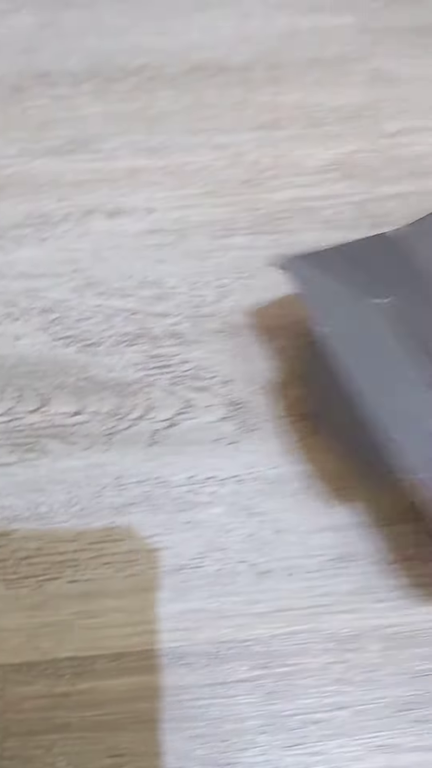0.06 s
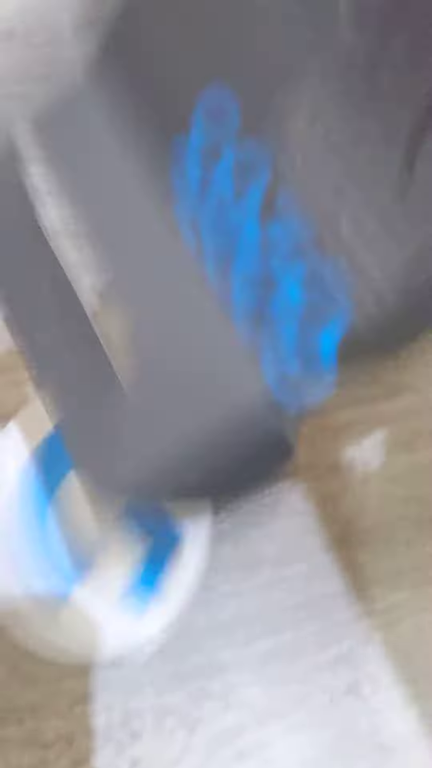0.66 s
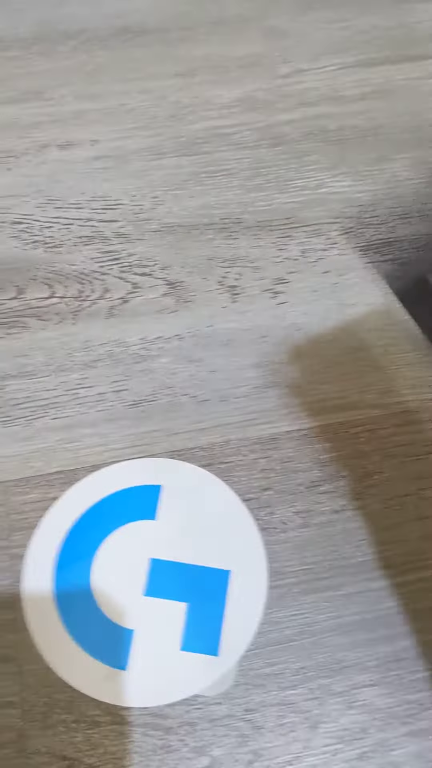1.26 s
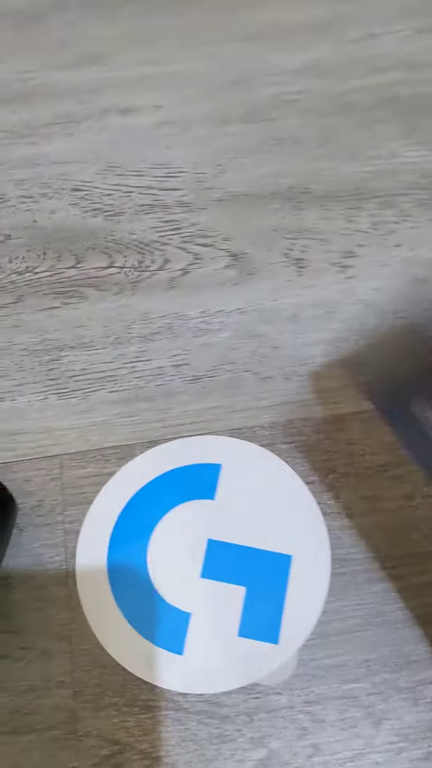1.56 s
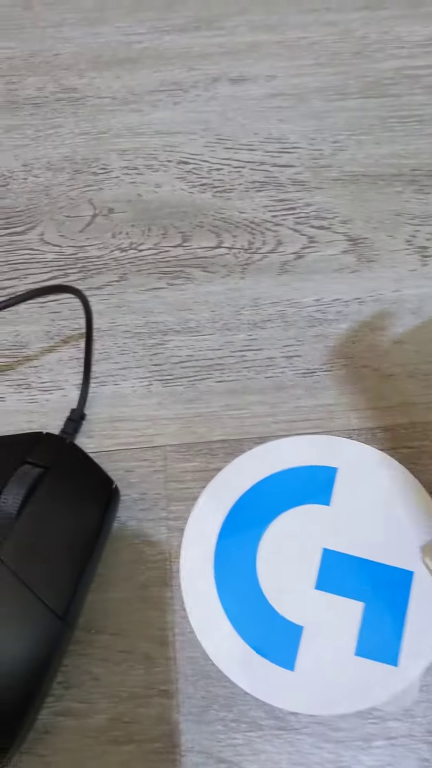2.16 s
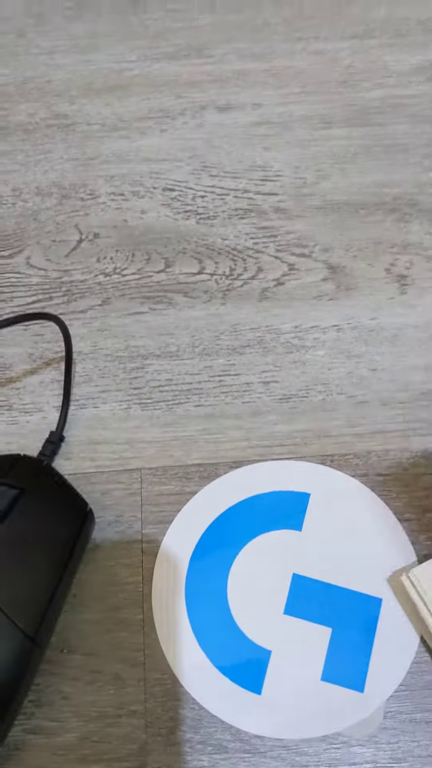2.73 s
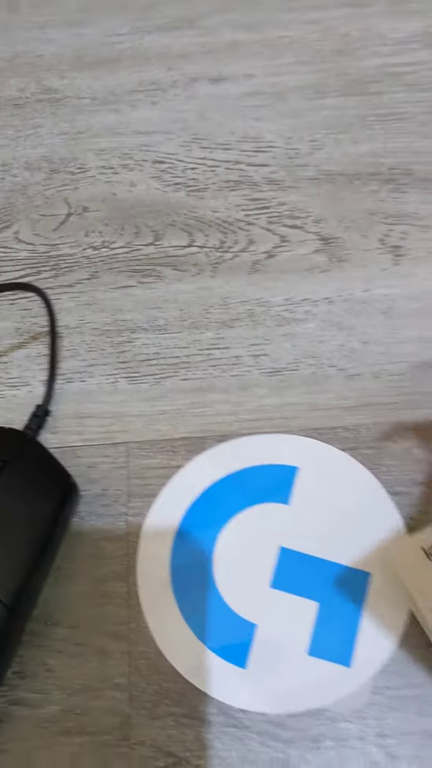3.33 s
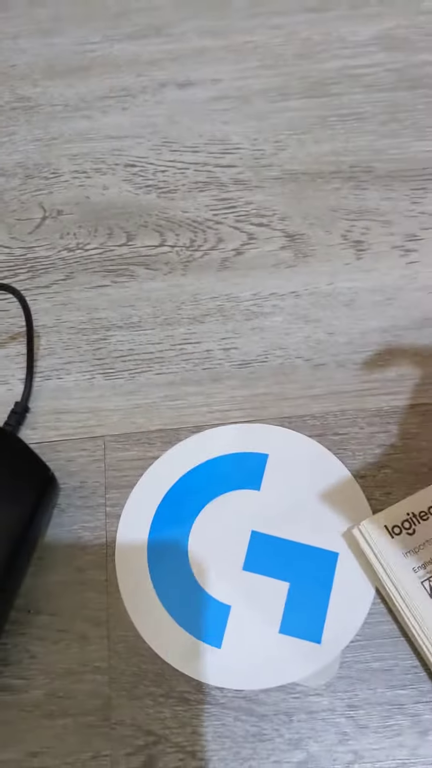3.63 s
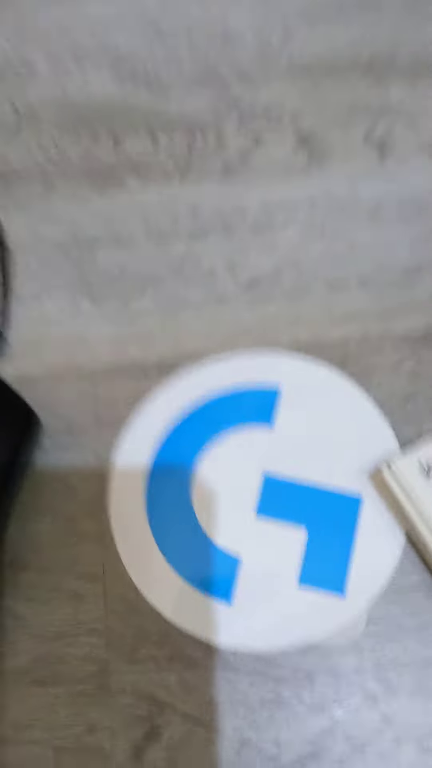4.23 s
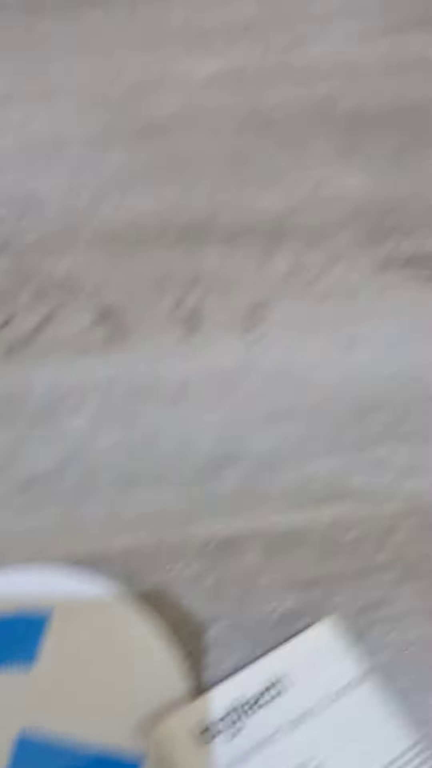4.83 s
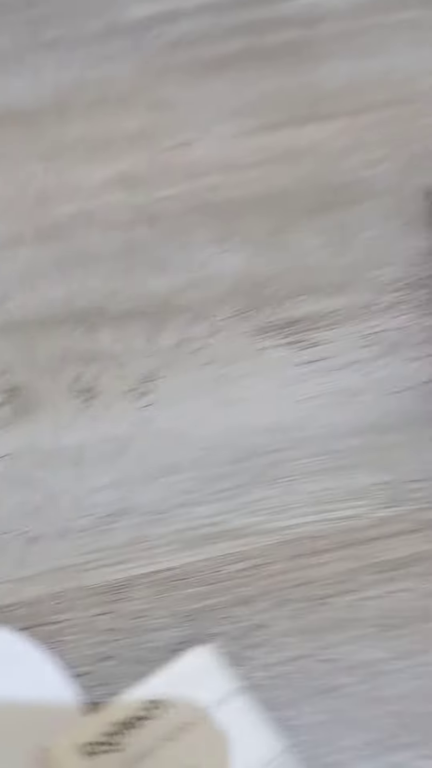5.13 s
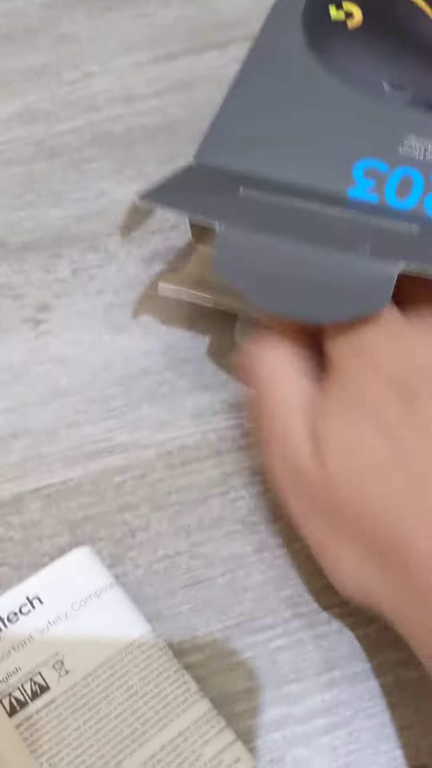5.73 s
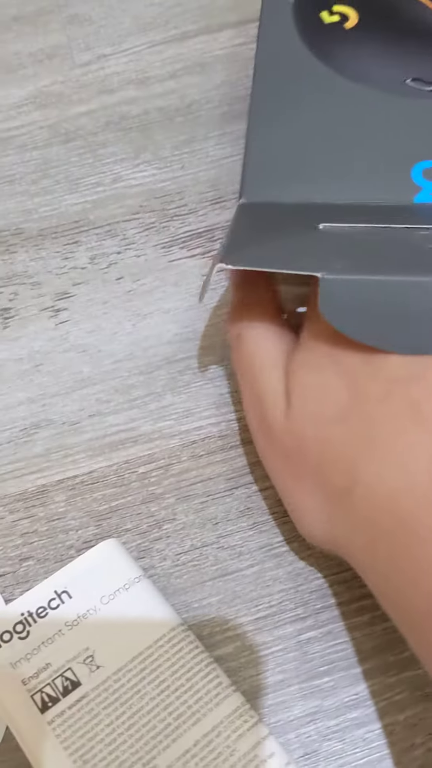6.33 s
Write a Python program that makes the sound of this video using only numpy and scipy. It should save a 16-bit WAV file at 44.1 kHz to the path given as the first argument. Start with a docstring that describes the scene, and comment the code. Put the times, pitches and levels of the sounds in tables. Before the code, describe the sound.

A thin cardboard box is handled close by on a laminate table in a small room. It opens with soft bumps and dry finger rubbing. Sharp, hollow knocks land at about 0.7, 0.8 and 1.2 seconds, then tumble in a quick run from 1.5 to 2.1, loudest near 1.9, mixed with card brushing card. A tiny squeak and light taps follow, and from 3 to 4 seconds there is only faint rubbing. After a few soft touches, a loud cluster of bumps and clicks comes at 4.5. Around 4.9 card slides briefly across the table with a bright swish. From 5.2 to the end at about 6.6, fingers scrape and rustle on the box, with soft thumps, flicking edges, two tiny high squeaks and two light knocks just after 6. Underneath are faint air noise, a distant low motor hum and a thin, wavering whine.

```python
"""A thin cardboard box is turned over, knocked and set down on a laminate table in a small room.
Each contact cracks, bending waves ring the panels, and the hollow box booms briefly.
Between knocks, fingers rub and squeak on the card, card brushes card, and the box slides once.
Behind it: room reflections, air noise, a distant motor and a thin whine."""
import sys
import numpy as np
from scipy import signal
from scipy.fft import rfft, irfft, next_fast_len
from scipy.io import wavfile
from scipy.ndimage import uniform_filter1d, map_coordinates

SR = 44100
rng = np.random.default_rng(int(sys.argv[2]) if len(sys.argv) > 2 else 0)


def generate_wav(sig):
    """Save sig (samples, or channels by samples) to the path in sys.argv[1] as 16-bit PCM at SR."""
    pcm = np.round(np.clip(np.atleast_2d(sig).T, -1, 1) * 32767).astype(np.int16)
    wavfile.write(sys.argv[1], SR, pcm)


N = 290619
HIT_SAMPLES, LEAD_SAMPLES = 8192, 400

# corner impacts: start_s, boom_db, panel_db, hardness_db, sharpness_db, boom_hz
KNOCKS = [(0.691, -21.5, -24, 7, 0.5, 346), (0.83, -20, -27.5, -3.5, -2, 267),
          (1.248, -22, -30.5, 2, 2, 278), (1.421, -49, -52.5, -2, -7.5, 141.6),
          (1.533, -29, -32.5, 2, -4, 291), (1.575, -24, -28, -3, -3, 232), (1.691, -20, -27.5, 2, 0.5, 283),
          (1.744, -21.5, -20.5, 1, -6, 345), (1.78, -27.5, -27, 0, -3.5, 291),
          (1.835, -22.5, -31, -1.5, 0, 283), (1.894, -11.5, -25, -10.5, 0.5, 324),
          (1.975, -21.5, -46.5, -17.5, 11, 333), (2.114, -25.5, -39.5, 2.5, 0.5, 350),
          (2.363, -48, -45.5, 2.5, -3, 207), (2.572, -41.5, -50.5, 0.5, -1.5, 320),
          (2.774, -38.5, -44, 1.5, -1.5, 185), (2.86, -44.5, -47, -0.5, -4.5, 371),
          (6.099, -33.5, -38.5, 6.5, 0.5, 221), (6.191, -35.5, -34, -2, 0, 215)]
# hand on a panel: start_s, panel_db, hardness_db, hollowness_db
BUMPS = [(0.034, -40.5, 4, -18), (0.126, -41.5, -12, -13), (0.17, -43, 4.5, -5), (0.377, -52.5, 12, 2),
         (2.695, -51, -1, -3), (3.975, -51, 5, -9.5), (4.077, -36, -5, 6.5), (4.187, -46.5, 5.5, 5),
         (4.504, -16.5, -6, -3), (4.533, -20.5, 9, 0.5), (4.542, -21.5, 1, -9), (4.55, -17, -2.5, -18),
         (4.582, -29, 3, -2), (4.664, -26.5, -23, 0), (5.217, -42.5, -3, 5), (5.262, -40.5, -2, 1),
         (5.474, -32, -5, -19), (5.524, -29, -6, 3.5), (5.598, -33, 2, 9), (5.609, -28.5, -21, 4),
         (5.674, -29.5, -7, -2), (6.38, -45, 4.5, 5)]
# edge flicks: start_s, level_db, sharpness_db, pan_db
CLICKS = [(0.62, -55, 6, -1), (1.138, -50.5, 5.5, -1), (1.806, -44, -14.5, -3), (1.958, -33, -3, 4),
          (1.985, -30, -2, -6.5), (2.114, -26.5, 0.5, 4.5), (2.129, -42.5, 6, 3.5), (2.541, -61.5, -6, -3),
          (3.917, -55, -2.5, -2), (4.016, -46, 8.5, 2), (4.501, -25, 8, -2), (4.579, -33, 9.5, 1),
          (4.645, -39.5, 8, 4), (5.097, -48, 13, -3), (5.271, -45.5, 7.5, 2.5), (5.506, -33, 2, 5),
          (6.062, -37.5, -2, 11), (6.071, -35.5, 8, 0.5), (6.172, -42, 2.5, 9), (6.541, -56, -4, 2)]
# mix per contact type: boom_db, panel_db, clack_db, snap_db, crack_db
KNOCK_MIX_DB = (-12.5, -13.5, -21, -23, -23)
BUMP_MIX_DB = (-16.5, -12.5, -24.5, -30.5, -32.5)
CLICK_MIX_DB = (-17.5, -15.5, -13, -13, -15.5)
# box resonances: pitch_hz, level_db, t60_s
CAVITY_MODES = [(125, -2.5, 0.02), (179, -5, 0.056), (231, 0, 0.066), (283.2, -0.5, 0.076),
                (337, -5, 0.057)]
PANEL_MODES = [(523, -13, 0.01), (656, -1.5, 0.065), (703.6, -8.5, 0.055), (758.7, -1.5, 0.11),
               (808, -13, 0.089), (885, -19.5, 0.08), (1055, -21.5, 0.049), (1293, -16.5, 0.085)]
# impact spectra: freq_hz, level_db
EDGE_CLACK = [(400, -27.5), (850, 4), (1250, 4), (1480, 2), (1680, 6.5), (2050, -5.5), (3000, -16.5),
              (5000, -52)]
FOLD_SNAP = [(1200, -45.5), (2400, 0.5), (3000, 1.5), (4200, 1), (5400, -5), (6800, -12), (10000, -43)]
FIBRE_CRACK = [(3000, -39), (5500, -6.5), (7000, -2.5), (8500, 3), (10000, -3.5), (11500, 3.5), (13500, -6),
               (16000, -11)]

# finger rubs: peak_s, rise_s, fall_s, level_db, brightness_db
RUBS = [(0.01, 0.15, 0.41, -45, -0.5), (0.509, 0.191, 0.14, -64, 5.5), (0.825, 0.15, 0.13, -43, 3.5),
        (1.31, 0.37, 0.2, -54.5, -3), (1.76, 0.53, 0.52, -45.5, 1.5), (2.5, 0.051, 0.099, -59.5, 1),
        (2.968, 0.52, 0.54, -61, 3), (3.93, 0.25, 0.15, -64, -1), (4.148, 0.29, 0.4, -59, -2),
        (4.41, 0.14, 0.24, -50, -1), (4.58, 0.18, 0.17, -37.5, -2), (4.73, 0.29, 0.2, -53.5, 7),
        (5.02, 0.8, 0.54, -57, 1), (5.42, 0.1, 0.36, -48, 2.5), (5.6, 0.43, 0.3, -41, -3),
        (5.88, 0.48, 0.18, -48.5, -0.5), (6.16, 0.17, 0.2, -44.5, 1.5), (6.57, 0.62, 0.15, -51, 1)]
# friction spectra: freq_hz, level_db
CARD_BODY = [(35, -31.5), (60, -26.5), (107, -10.5), (162, 1.5), (257, 2), (284, 6), (360, -3.5), (440, -5),
             (493, -4.5), (587, -4.5), (641, -0.5), (736, -2), (834, 0), (866, -4.5), (1200, -37.5),
             (1560, -52.5), (2640, -120)]
TABLE_RUMBLE = [(20, -41.5), (40, -15.5), (65, 0), (100, -7.5), (250, -50)]
CARD_SCRAPE = [(500, -26.5), (1000, 1), (1600, 3), (2000, -2.5), (2700, -2), (3500, -9.5), (6000, -38.5)]
CARD_HISS = [(1760, -18), (3000, -3.5), (3890, -2.5), (4440, -0.5), (4900, -5.5), (5840, -5), (6950, -3),
             (11100, -4), (15100, -9), (16000, -24.5)]
SLIDE_SWISH = [(710, -47), (1200, -27), (1410, -32), (1540, -36), (1660, -21), (2270, -11), (3790, -9),
               (4860, -10), (8440, 2), (9930, -2), (11300, 2), (16000, -13.5)]
# short rasps: start_s, length_s, level_db, centre_hz
CARD_BRUSHES = [(0.049, 0.017, -32.5, 8100), (0.28, 0.11, -40, 9600), (0.559, 0.011, -52.5, 9000),
                (0.705, 0.056, -41, 2980), (0.782, 0.074, -40.5, 8950), (1.21, 0.077, -42.5, 7000),
                (1.71, 0.047, -32.5, 7900), (1.755, 0.06, -39, 1503), (3.097, 0.049, -54, 6900),
                (3.818, 0.01, -56, 3430), (4.178, 0.065, -53.5, 6900), (5.894, 0.049, -46.5, 7000),
                (5.984, 0.0072, -47, 9000), (6.031, 0.011, -64, 4000), (6.128, 0.1, -42.5, 6960)]
FINGER_SQUEAKS = [(2.24, 0.023, -43.5, 896), (2.408, 0.072, -55.5, 950), (5.369, 0.025, -37, 3350),
                  (6.059, 0.0059, -30.5, 2460)]

# reverb decay: freq_hz, t60_s
ROOM_DECAY = [(150, 0.19), (700, 0.25), (3000, 0.28), (8000, 0.28), (15000, 0.13)]
# reverb and air spectra: freq_hz, level_db
ROOM_SEND = [(100, -4.5), (300, -17.5), (800, -10.5), (2500, -6.5), (8000, -11.5), (15000, -7)]
ROOM_AIR = [(15, -58), (25, -43), (70, -18.5), (80, -18), (102, -14.5), (130, -26.5), (166, -13),
            (190, -20.5), (309, -36.5), (3820, -38.5), (4370, -41.5), (4870, -48), (13600, -50),
            (16000, -36)]
# distant motor: pitch_hz, level_db
MOTOR_HUM = [(101, -62.5), (162, -70.5)]
# swells of the whine: peak_s, rise_s, fall_s, level_db
WHINE_SWELLS = [(0.55, 0.16, 0.9, -70.5), (2.95, 0.3, 0.42, -58), (3.8, 0.3, 0.6, -66.5),
                (5.25, 0.34, 0.3, -65)]
# left-right likeness: freq_hz, correlation
STEREO_CORRELATION = [(60, 0.81), (300, 0.91), (600, 0.7), (1100, 0.045), (4000, 0.046), (14000, 0.058)]
# microphone balance: freq_hz, left_minus_right_db
MIC_BALANCE = [(60, 3), (250, 0.2), (600, 0.5), (1000, 0.5), (2000, -1), (4000, 2.5), (8000, 5), (12000, 1),
               (16000, -6)]


def knocks(settle_s=0.024, settle_db=-14, settle_hard_db=-1, settle_hz_ratio=0.55):
    """A corner lands and the box booms, then rocks onto its face, softer and lower."""
    settles = [(s + settle_s, boom + settle_db, panel + settle_db,
                hard + settle_hard_db, sharp, hz * settle_hz_ratio)
               for s, boom, panel, hard, sharp, hz in KNOCKS]
    blows, pan_db = [], 0.2
    for start_s, boom_db, panel_db, hard_db, sharp_db, boom_hz in KNOCKS + settles:
        snap_db = boom_db + hard_db
        levels_db = np.add([boom_db, panel_db, snap_db - sharp_db, snap_db, snap_db + sharp_db],
                           KNOCK_MIX_DB)
        blows.append((start_s, levels_db, boom_hz, pan_db))
    return strike(blows, chatter_share=0.25, crush_t60_s=0.017)


def bumps(boom_hz=280, pan_db=-1.5):
    """A soft hand mostly rings the panels; over the hollow it also booms."""
    blows = [(start_s, db + np.add([hollow_db, 0, hard_db, hard_db, hard_db], BUMP_MIX_DB), boom_hz,
              pan_db) for start_s, db, hard_db, hollow_db in BUMPS]
    return strike(blows, chatter_share=0.61, crush_t60_s=0.045)


def clicks(boom_hz=230):
    """An edge catches and flicks free; a sharper flick has more crack, less clack."""
    tilt = np.array([0.51, -0.3, -1.04, -0.12, 1])
    blows = [(start_s, db + sharp_db * tilt + CLICK_MIX_DB, boom_hz, pan_db)
             for start_s, db, sharp_db, pan_db in CLICKS]
    return strike(blows, chatter_share=0.3, crush_t60_s=0.017)


def strike(blows, chatter_share, crush_t60_s):
    """A push plus edge chatter rings cavity and panels; crushing fibres clack, snap and crack."""
    out = np.zeros((2, N + HIT_SAMPLES))
    cavity_bend, panel_bend = bending_waves()
    edge, fold, fibre = map(minimum_phase, (EDGE_CLACK, FOLD_SNAP, FIBRE_CRACK))
    through = lambda x, response: unit(irfft(rfft(x) * response))
    for start_s, levels_db, boom_hz, pan_db in blows:
        boom, panel, clack, snap, crack = amp(levels_db)
        force = whiten(crush(crush_t60_s, spike_db=3, rise_s=0.00069))
        chatter = crush(0.026, spike_db=-3, rise_s=0.00088)[0]
        drive = 1 + chatter_share * rfft(chatter / np.linalg.norm(chatter))
        cavity_ring = ring(driven_modes(CAVITY_MODES, boom_hz), stereo_rad=0.2)
        panel_ring = ring(PANEL_MODES, stereo_rad=0.68)
        low = boom * through(cavity_ring, drive * cavity_bend)
        low += panel * through(panel_ring, drive * panel_bend) * amp([[-1.5], [1.5]])
        pan = amp([[pan_db / 2], [-pan_db / 2]])
        high = clack * through(force, edge)
        high += pan * (snap * through(force, fold) + crack * through(force, fibre))
        start = round(start_s * SR) - LEAD_SAMPLES  # a faint scuff leads in
        out[:, start:start + HIT_SAMPLES] += np.roll(low + high, LEAD_SAMPLES, axis=1)
    return out[:, :N]


def bending_waves(max_lag_s=0.02002, half_lag_hz=135):
    """Cavity and panel responses. Dispersion: the lows arrive after the crack."""
    hz = np.fft.rfftfreq(HIT_SAMPLES, 1 / SR)
    lag_s = max_lag_s / (1 + (hz / half_lag_hz) ** 2)
    bend = radiation(hz, corner_hz=116) * np.exp(-2j * np.pi * np.cumsum(lag_s) * hz[1])
    return bend, bend * radiation(hz, corner_hz=288)


def radiation(hz, corner_hz):
    """High-pass: a small box moves little air below its lowest resonance."""
    s = 1j * hz / corner_hz
    return s ** 3 / ((s + 1) * (s * s + s + 1))


def driven_modes(modes, centre_hz, db_per_octave=12):
    """The contact point favours modes near one pitch."""
    return [(hz, db - db_per_octave * abs(np.log2(hz / centre_hz)), t60_s) for hz, db, t60_s in modes]


def ring(modes, stereo_rad, scatter_db=2, detune=0.02):
    """Damped modes; grip and contact point scatter their pitch and strength."""
    hz, db, t60_s = np.transpose(modes)[:, :, None]
    pitch, strength, side = rng.standard_normal((3, len(modes), 1))
    t = np.arange(HIT_SAMPLES) / SR
    envelope = amp(db + scatter_db * strength - 60 * t / t60_s)
    phase = 2 * np.pi * hz * (1 + detune * pitch) * t
    offset_rad = stereo_rad * (1 + side) / 2
    return np.array([np.sum(envelope * np.sin(phase + ear * offset_rad), 0) for ear in (-1, 1)])


def crush(t60_s, spike_db, rise_s):
    """Fibres give way in a short, spiky burst of force."""
    t = np.arange(HIT_SAMPLES) / SR
    spikes = amp(spike_db * unit(uniform_filter1d(rng.standard_normal(HIT_SAMPLES), size=14)))
    envelope = (1 - np.exp(-t / rise_s)) * amp(-60 * t / t60_s)
    return rng.standard_normal((2, HIT_SAMPLES)) * spikes * envelope


def whiten(burst):
    """Many fibres break at once, so the burst has no strong pitch."""
    spectrum = rfft(burst)
    power = np.abs(uniform_filter1d(np.abs(spectrum) ** 2, size=25)) + 1e-12
    return irfft(spectrum / np.sqrt(power))


def rubbing(body_db=1, rumble_db=-13, scrape_db=-4, hiss_db=-1):
    """Fingers catch and slip: the card resonates, scrapes and hisses; the table rumbles."""
    speed = np.array([swell(peak_s, rise_s, fall_s) for peak_s, rise_s, fall_s, _, _ in RUBS])
    db, bright_db = np.transpose(RUBS)[-2:]
    low, mid, high = np.sqrt(amp([db - bright_db, db, db + bright_db]) ** 2 @ speed ** 2)
    slips = np.minimum(unit(wobble(600) + 3 * wobble(80)), 2)
    body = amp(body_db) * low * friction(CARD_BODY, slips, grain_db=1.5, patch_db=3.5)
    rumble = amp(rumble_db) * low * friction(TABLE_RUMBLE, slips, grain_db=-0.5, patch_db=4.5)
    scrape = amp(scrape_db) * mid * friction(CARD_SCRAPE, slips, grain_db=3, patch_db=0)
    hiss = friction(CARD_HISS, slips, grain_db=2, patch_db=4.5)
    ticks = 0.31 * crinkles(rate_hz=160) + 0.43 * crinkles(rate_hz=40)
    return body + rumble + scrape + amp(hiss_db) * high * (hiss + ticks)


def friction(spectrum, slips, grain_db, patch_db):
    """Rubbing noise, rms 1: the level jumps with each slip, the colour keeps shifting."""
    bins = signal.stft(rng.standard_normal((2, N)), nperseg=256)[2]
    patches = uniform_filter1d(rng.standard_normal(bins.shape[1:]), size=5, axis=0)
    patches = unit(uniform_filter1d(patches, size=5, axis=1))
    noise = signal.istft(bins * amp(patch_db * patches), nperseg=256)[1][:, :N]
    return unit(spread(noise * amp(grain_db * slips), spectrum))


def crinkles(rate_hz, size_db=3, decay_s=0.001):
    """Single fibres snap at random: ticks, rms 1."""
    snaps = (rng.random(N) < rate_hz / SR) * amp(size_db * np.minimum(rng.exponential(size=N), 2))
    bursts = signal.lfilter([1], [1, -np.exp(-1 / (decay_s * SR))], snaps)
    return unit(spread(bursts * rng.standard_normal((2, N)), CARD_HISS))


def slide(peak_s=4.924, push_s=0.084, glide_s=0.18, stop_s=0.065, level_db=-32.5, sag_db_per_s=26):
    """Card swishes over laminate: pushed, slowing as it glides, stopped."""
    elapsed_s = np.clip(np.arange(N) / SR - peak_s, 0, glide_s)
    envelope = amp(level_db - sag_db_per_s * elapsed_s) * swell(peak_s, push_s, stop_s, glide_s)
    swish = friction(SLIDE_SWISH, wobble(600), grain_db=-1.5, patch_db=2)
    return envelope * swish * amp([[2.5], [-2.5]])


def rasps(strokes, width_octaves, grain_db=3):
    """Grainy noise bands: wide for card brushing card, narrow for a sticking fingertip."""
    out = np.zeros((2, N + SR))
    for start_s, length_s, db, centre_hz in strokes:
        start, n = round(start_s * SR), min(int(length_s * SR), HIT_SAMPLES)
        grains = amp(grain_db * unit(uniform_filter1d(rng.standard_normal(HIT_SAMPLES), size=40)))
        band = lambda hz: np.exp(-0.5 * (np.log2((hz + 1) / centre_hz) / width_octaves) ** 2)
        rasp = unit(filtered(rng.standard_normal((2, HIT_SAMPLES)) * grains, band))[:, :n]
        out[:, start:start + n] += amp(db) * rasp * np.sqrt(np.hanning(n))
    return out[:, :N]


def room(x, build_s=0.0029):
    """Wall reflections; a new tail every quarter second as the box moves."""
    out = np.zeros((2, N + 2 * SR))
    step = SR // 4
    for start in range(0, N, step):
        hz, t, bins = signal.stft(rng.standard_normal((2, SR // 2)), SR, nperseg=256)
        envelope = amp(-60 * t / along(ROOM_DECAY, hz)[:, None]) * (1 - np.exp(-t / build_s))
        tail = signal.istft(bins * envelope, SR, nperseg=256)[1]
        wet = signal.fftconvolve(x[:, start:start + step], tail / np.linalg.norm(tail[0]), axes=1)
        out[:, start:start + wet.shape[1]] += wet
    return spread(out[:, :N], ROOM_SEND)


def motor_hum():
    """A distant motor: two low tones, drifting in phase."""
    t = np.arange(N) / SR
    return sum(amp(db) * np.sqrt(2) * np.sin(2 * np.pi * hz * t + 0.25 * wobble(5))
               for hz, db in MOTOR_HUM)


def whine(centre_hz=4490, flutter_db=2.5, rest_db=-85.5, gain_db=-6):
    """A thin, wavering tone that swells now and then."""
    pitch_hz = centre_hz + 6 * wobble(8.9) + 16 * wobble(140)
    tone = np.sqrt(2) * np.sin(2 * np.pi * np.cumsum(pitch_hz) / SR)
    swells = sum(amp(db) * swell(peak_s, rise_s, fall_s) for peak_s, rise_s, fall_s, db in WHINE_SWELLS)
    return tone * amp(gain_db + flutter_db * wobble(18)) * (amp(rest_db) + swells)


def room_air(level_db=-62):
    """Steady, bass-heavy noise."""
    return amp(level_db) * unit(spread(rng.standard_normal((2, N)), ROOM_AIR))


def amp(db):
    """Decibels to gain."""
    return 10 ** (np.asarray(db) / 20)


def unit(x):
    """Scale to rms 1."""
    return x / np.sqrt(np.mean(x ** 2) + 1e-20)


def along(points, hz):
    """Interpolate (freq_hz, value) points on a log axis."""
    freq_hz, values = np.transpose(points)
    return np.interp(np.log(hz + 1), np.log(freq_hz + 1), values)


def wobble(rate_hz):
    """Smooth random curve."""
    knots = rng.standard_normal(int(N * rate_hz / SR) + 4)
    return map_coordinates(knots, [np.arange(N) * rate_hz / SR])


def swell(peak_s, rise_s, fall_s, hold_s=0, depth_db=21.5, curve=1.075):
    """Gain: climbs depth_db over rise_s, holds at 1, drops depth_db over fall_s."""
    t = np.arange(N) / SR - peak_s
    distance = np.maximum(-t / rise_s, (t - hold_s) / fall_s)
    return amp(-depth_db * np.clip(distance, 0, 10) ** curve)


def filtered(x, response):
    """Apply response(hz) by FFT."""
    n = x.shape[-1]
    padded = next_fast_len(n + HIT_SAMPLES)
    return irfft(rfft(x, padded) * response(np.fft.rfftfreq(padded, 1 / SR)), padded)[..., :n]


def minimum_phase(spectrum):
    """Causal response on the frequency grid of one hit."""
    cepstrum = irfft(np.log(amp(along(spectrum, np.fft.rfftfreq(HIT_SAMPLES, 1 / SR)))))
    cepstrum[1:HIT_SAMPLES // 2] *= 2
    cepstrum[HIT_SAMPLES // 2 + 1:] = 0
    return np.exp(rfft(cepstrum))


def spread(pair, spectrum):
    """Colour two unrelated signals and mix to stereo: bass alike, treble apart."""
    def response(hz):
        angle_rad = np.arccos(along(STEREO_CORRELATION, hz)) / 2
        return amp(along(spectrum, hz)) * [np.cos(angle_rad), np.sin(angle_rad)]
    mid, side = filtered(pair, response)
    return np.array([mid + side, mid - side])


def scene():
    """The handled box in its room."""
    box = knocks() + bumps() + clicks() + rubbing() + slide()
    box += rasps(CARD_BRUSHES, width_octaves=1.46) + rasps(FINGER_SQUEAKS, width_octaves=0.12)
    return box + room(box) + motor_hum() + whine() + room_air()


def record(dry):
    """Two microphones of unequal colour, then a steep low-pass."""
    cutoff_hz = 16100
    heard = filtered(dry, lambda hz: amp(np.outer([0.5, -0.5], along(MIC_BALANCE, hz))))
    return filtered(heard, lambda hz: 1 / np.sqrt(1 + (hz / cutoff_hz) ** 160))


dry = scene()
out = record(dry)
generate_wav(out)
```